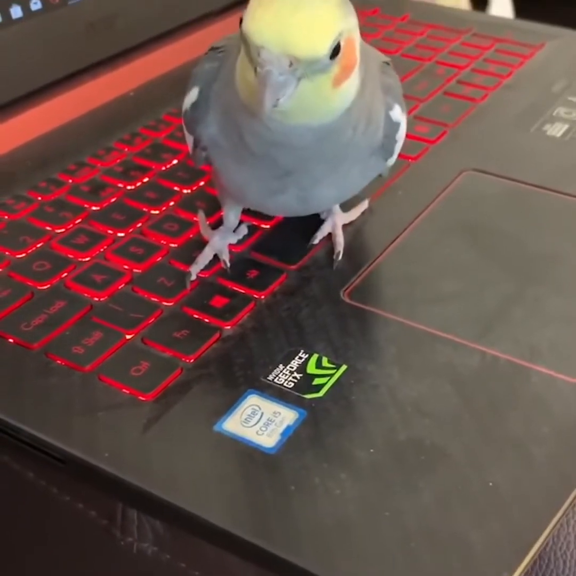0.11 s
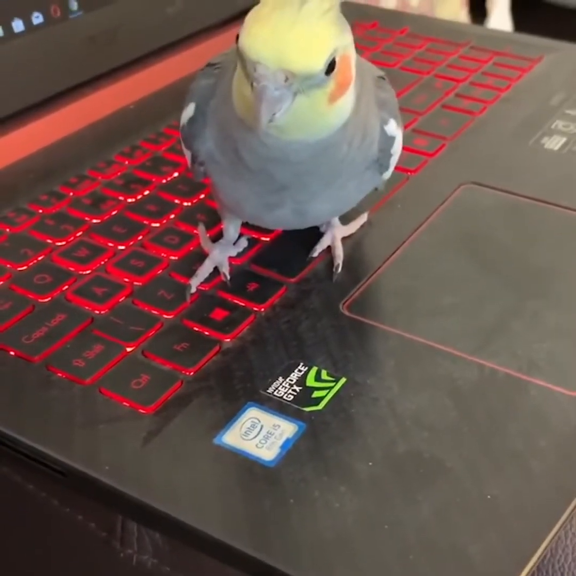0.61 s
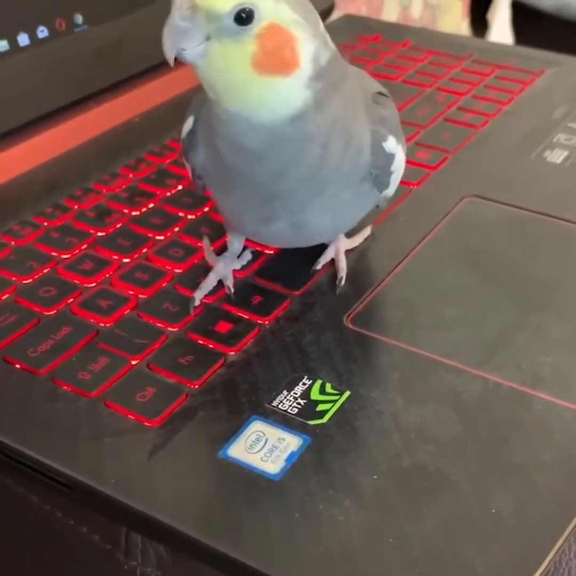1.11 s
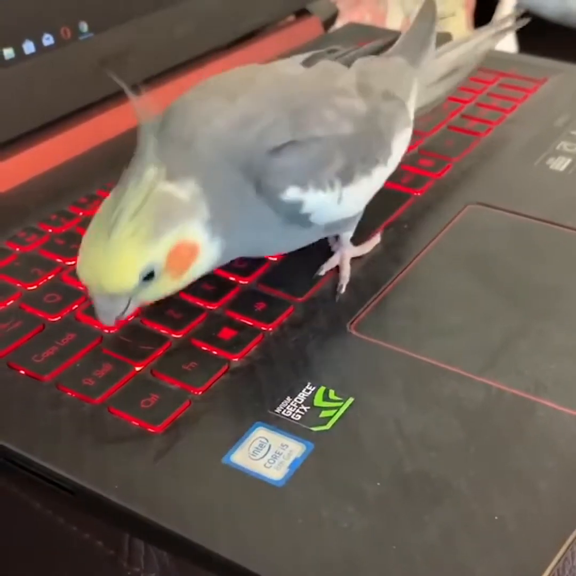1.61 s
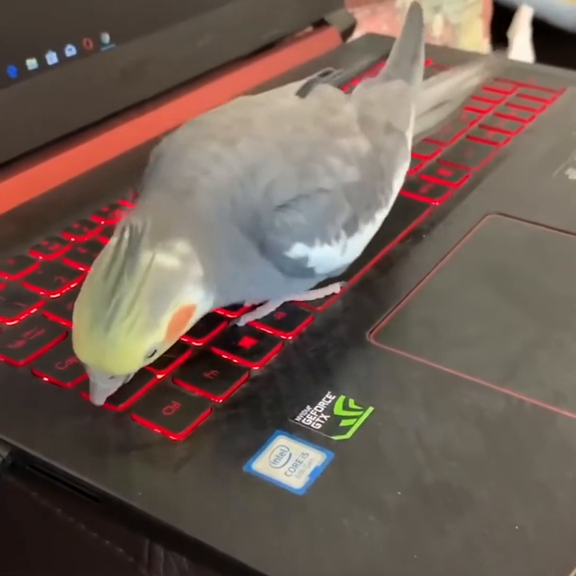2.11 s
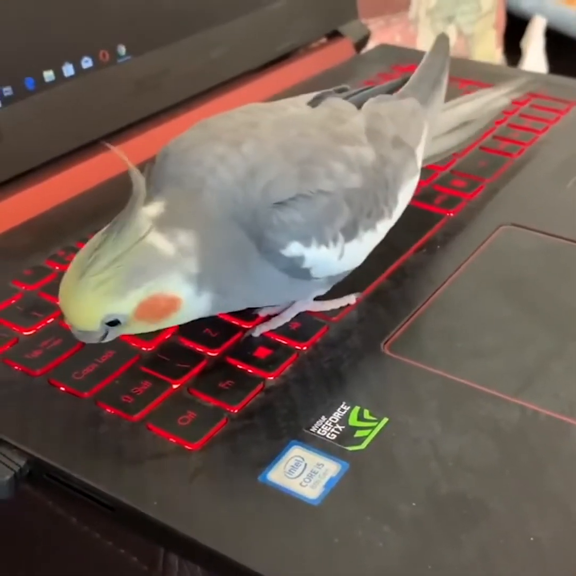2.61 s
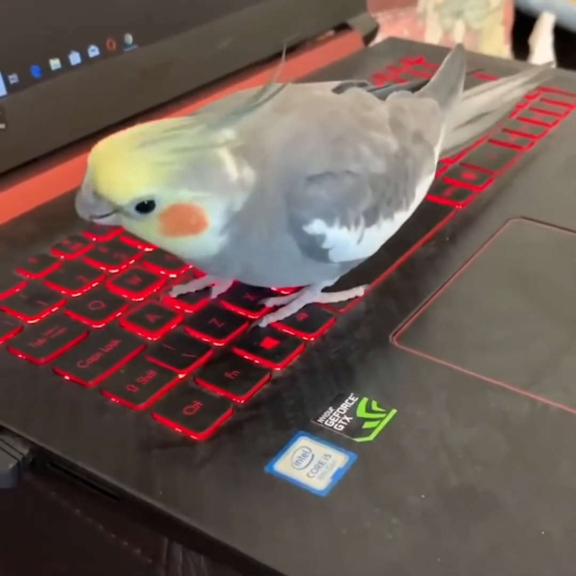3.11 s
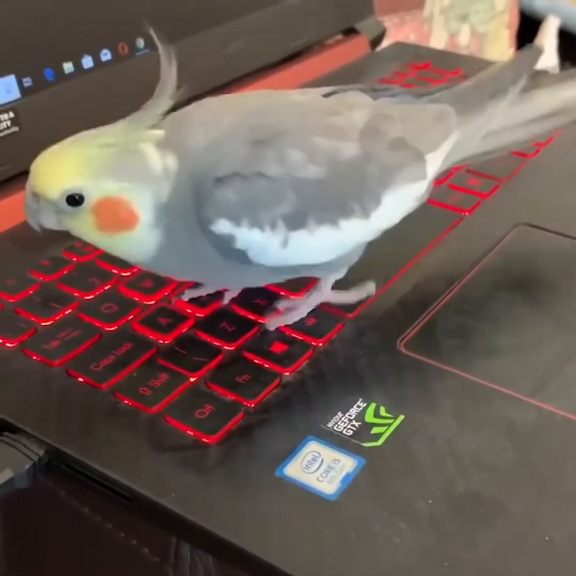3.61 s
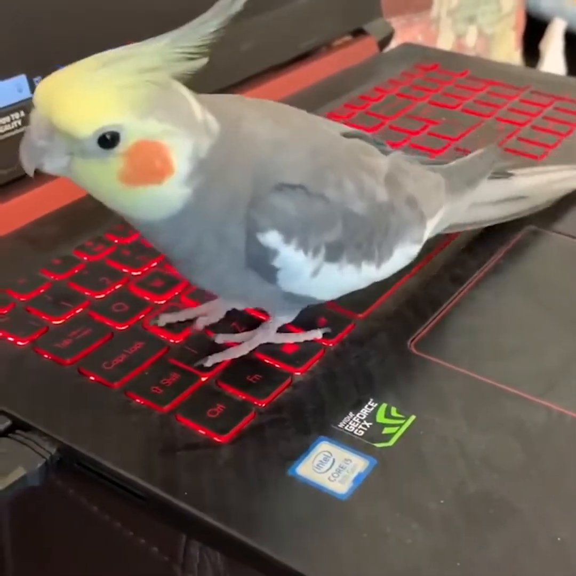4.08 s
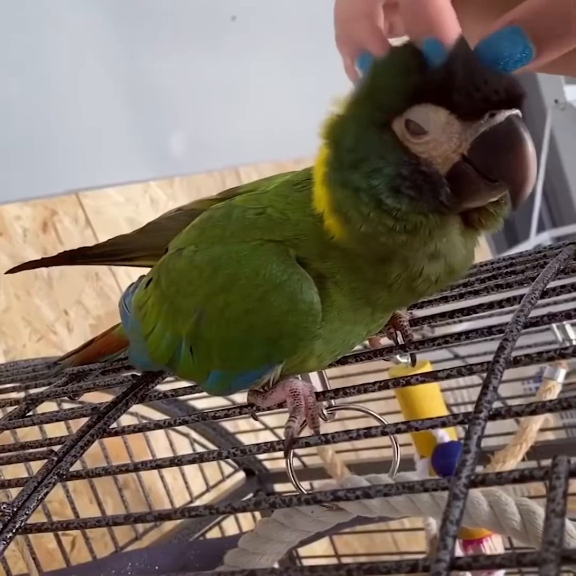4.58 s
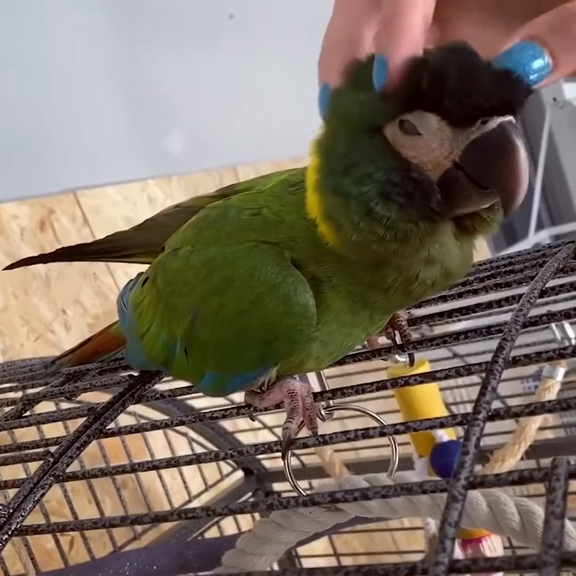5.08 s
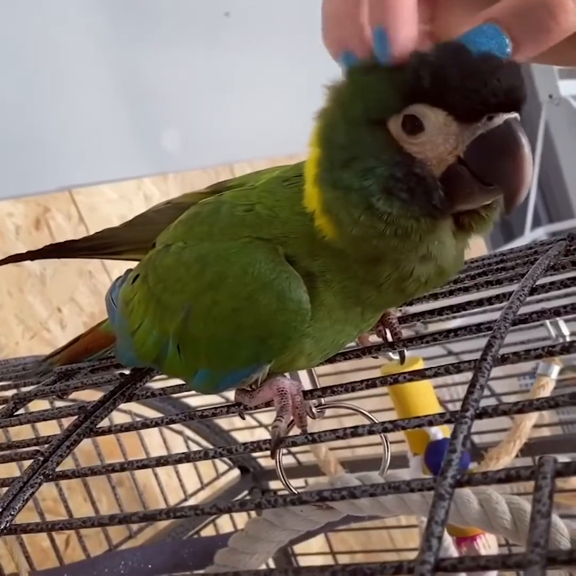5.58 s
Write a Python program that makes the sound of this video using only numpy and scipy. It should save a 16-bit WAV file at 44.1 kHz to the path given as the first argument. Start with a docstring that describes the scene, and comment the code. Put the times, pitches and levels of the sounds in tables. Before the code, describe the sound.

In a very quiet room a small bird steps on laptop keys: soft thuds, then crisp claw ticks and dry scrapes in uneven clusters. After a near-silent gap, four evenly spaced hollow knocks ring a wooden table, beaks tapping close to a phone microphone. An abrupt cut brings a steady low fan hum and blowing air, with a brief soft feather ruffle.

```python
"""Parrot on a laptop, then fan room

In a quiet room claws tick and scrape on keys (noise bursts and slips through resonances), soft steps thud
(sine plus ringing noise) and four like knocks ring a wooden table (decaying modes and a dense noise tail).
Then a cut to a second room: a fan motor hums (wavering tones) and blows (shaped noise) while fingers
ruffle feathers (dense slips). A phone with two microphone ports listens."""
import sys
import numpy as np
from scipy import signal
from scipy.fft import rfft, irfft
from scipy.io import wavfile
from scipy.ndimage import uniform_filter1d

SR = 44100
rng = np.random.default_rng(int(sys.argv[2]) if len(sys.argv) > 2 else 0)


def gain_from_db(level_db):
    """Convert decibel levels to linear amplitude factors (20 dB per decade)."""
    decades = np.asarray(level_db, float) / 20
    return 10 ** decades


def to_wav(s):
    """Save 16-bit WAV."""
    ch = np.atleast_2d(s).T  # columns
    pcm = np.round(np.clip(ch, -1, 1) * 32767)  # PCM
    wavfile.write(sys.argv[1], SR, pcm.astype(np.int16))


N = 251790

# Key cap resonances. Each row: centre in Hz, width in Hz, level in dB.
KEY_CAP = [(3260, 1350, -2.5), (6170, 2140, 9.5), (7900, 2260, 13.5), (8970, 1290, 14.5), (10360, 1800, -1),
           (11550, 960, -3)]
# Resonances of the plate under the keys. Each row: centre in Hz, width in Hz, level in dB.
KEY_PLATE = [(800, 1000, -11.5), (1105, 160, 8), (1586, 1360, -1)]
# Phase between the ports. Each row: frequency in Hz, lead of the left in rad.
PORT_LEAD = [(60, 0), (1500, 0.83), (3300, 1.3), (4400, 3), (5300, 4), (6900, 6), (8600, 9.5), (9400, 10),
             (11000, 11), (13500, 10)]


def evened(x):
    """Scales to rms 1."""
    return x / np.sqrt(np.mean(x ** 2) + 1e-20)


def read(points, hz):
    """Looks up a table on a log-frequency axis."""
    f, value = np.transpose(points)
    return np.interp(np.log(hz + 1), np.log(f + 1), value)


def add(mix, s, sound):
    """Mixes a sound in at s seconds."""
    part = mix[..., round(s * SR):][..., :sound.shape[-1]]
    part += sound[..., :part.shape[-1]]


def ring(x, modes):
    """Sums one-pole complex resonances (Hz, width, dB) driven by x, with alternating signs."""
    out = np.zeros(x.shape)
    for k, (hz, width, db) in enumerate(modes):
        pole = np.exp((2j * hz - width) * np.pi / SR)
        mode = signal.lfilter([1], [1, -pole], x).real
        out += (-1) ** k * gain_from_db(db) * (1 - abs(pole)) * mode
    return out


def noise(colour, same, lead, size, patchy_db):
    """Two-port noise as short-time spectra (channel, Hz, frame) with drifting patches."""
    hz = np.fft.rfftfreq(size, 1 / SR)[:, None]
    a, b, c, d, patches = rng.standard_normal((4 * N // size + 5, len(hz), 5)).T
    patches = uniform_filter1d(patches, size=12, axis=0)
    patches = evened(uniform_filter1d(patches, size=10, axis=1))
    like = np.clip(read(same, hz), -1, 1)
    left = a + 1j * b
    shared = like * left * np.exp(-1j * read(lead, hz))
    right = shared + np.sqrt(1 - like ** 2) * (c + 1j * d)
    return np.array([left, right]) * gain_from_db(read(colour, hz) + patchy_db * patches)


def played(z):
    """Short-time spectra back to sound."""
    size = 2 * z.shape[1] - 2
    return signal.istft(z, nperseg=size, noverlap=3 * size // 4)[1][:, :N]


def rubbing(rubs, bodies, per_s, spread_db):
    """Dense tiny slips of uneven size; each rub swells, fades and mostly rings the body nearest its brightness."""
    rise, edge_db = 0.5, -19  # share of a rub before its peak, level at its ends
    focus_db = -18.5  # loss at a brightness distance of 1
    slips = rng.choice([-1., 1.], (2, N)) * (rng.random((2, N)) < per_s / SR)
    slips *= gain_from_db(spread_db * np.minimum(rng.exponential(1, (2, N)), 2.5))
    out, t = np.zeros((2, N)), np.arange(N) / SR
    for place, modes in bodies:
        power = np.zeros(N)
        for s, length, db, bright in rubs:
            near = slice(max(round((s - 2 * length) * SR), 0), round((s + 2 * length) * SR))
            away = np.maximum((s - t[near]) / rise, (t[near] - s) / (1 - rise)) / length
            power[near] += gain_from_db(db + focus_db * (bright - place) ** 2 + edge_db * away) ** 2
        out += np.sqrt(power) * evened(ring(slips, modes))
    return out


def hum(tones, wander):
    """Tones (Hz, dB rms before wavering) whose strength and phase waver, the phase of higher ones more."""
    t, out = np.arange(N) / SR, np.zeros(N)
    for hz, db in tones:
        slow = uniform_filter1d(rng.standard_normal((2, N)), size=1500)
        swell, drift = uniform_filter1d(slow, size=1500)
        turns = hz * t + rng.random() + wander * np.sqrt(hz) * evened(drift)
        out += gain_from_db(db + 2.2 * evened(swell)) * np.sqrt(2) * np.sin(2 * np.pi * turns)
    return out


def ticks():
    """A claw tip chatters for a moment and rings the key cap and the plate under it."""
    # Each row: time in seconds, cap peak in dB before filtering, plate peak in dB re cap, chatter t60 in seconds.
    tick_rows = [(1.42, -69.5, 11, 0.012), (1.4616, -59, -21, 0.012), (1.501, -55, -25, 0.006),
                 (1.515, -53, -24, 0.008), (1.5245, -28.5, -27.5, 0.0079), (1.529, -50, -13, 0.02),
                 (1.608, -47.5, -5, 0.028), (1.8301, -25.5, -17.5, 0.014), (1.8345, -28, -11, 0.0051),
                 (1.8437, -20, -17.5, 0.0066), (1.846, -39, -6, 0.011), (2.013, -40, -16, 0.014),
                 (2.064, -54, -10, 0.0089), (2.0796, -53, -17, 0.033), (2.1025, -44, -23, 0.013),
                 (2.129, -37, -8, 0.009), (2.1896, -52.5, -1.5, 0.02), (2.26, -63, -3, 0.029),
                 (2.322, -46, -25, 0.011), (2.372, -58, -1, 0.0082), (3.554, -72, 18, 0.012),
                 (3.905, -60, 10, 0.031), (4.054, -63, -7, 0.017), (4.067, -52, -1, 0.0093),
                 (3.7823, -38, -34, 0.013), (3.799, -36.5, -19, 0.029), (4.166, -32, -20, 0.008),
                 (4.175, -45, -9, 0.0059), (4.198, -58, 14, 0.011)]
    out, t = np.zeros(N), np.arange(2000) / SR
    for (s, db, dull_db, t60), jitter in zip(tick_rows, rng.standard_normal((len(tick_rows), 2000))):
        rise = 0.14 * t60  # a longer scratch also starts more gently
        decay_db = -60 * np.maximum(t - 2 * rise, 0) / t60
        onset_db = -30.0 * np.maximum(1 - t / rise / 2, 0)
        chatter = jitter * gain_from_db(decay_db + onset_db)
        chatter[round(2 * rise * SR)] += 2.5  # the tip snaps free
        cap, plate = ring(chatter, KEY_CAP), ring(chatter, KEY_PLATE)
        tick = cap / abs(cap).max() + gain_from_db(dull_db) * plate / abs(plate).max()
        add(out, s - rise, gain_from_db(db) * tick)
    return out


def scrapes():
    """Claws and feathers rub: slips ring the plate, the lower and the upper cap modes."""
    # Each row: peak time in seconds, length in seconds, level in dB,
    # brightness (-1 plate, 0 key caps, 1 finest fizz).
    scrape_rows = [(.2, 0.31, -70.5, 0.33), (.55, .16, -75, 0.045), (1.02, 0.071, -57, -1.4),
                   (1.11, 0.077, -60.5, -1.3), (1.465, .09, -71, 0.77), (1.535, 0.13, -61.5, 0.42),
                   (1.62, 0.059, -59.5, 0.46), (1.86, 0.1, -62.5, 0.13), (1.88, 0.13, -60, 0.24),
                   (1.91, 0.092, -65, -0.81), (1.93, 0.12, -55, 1.15), (1.97, 0.24, -69, 0.36),
                   (2.01, 0.058, -63, 0.018), (2.08, 0.07, -52.5, 0.47), (2.13, 0.074, -60, -0.094),
                   (2.11, 0.13, -62.5, 1), (2.24, 0.3, -68.5, -1.08), (2.265, 0.11, -65.5, 0.97),
                   (2.33, 0.11, -65, 0.085), (2.375, 0.043, -72, 0.58), (2.965, 0.095, -68, 0.31),
                   (3.76, 0.052, -62, -0.41), (3.805, 0.044, -45, 0.59), (4.075, 0.044, -63, -0.6),
                   (4.16, 0.11, -73, 0.82)]
    bodies = [(-0.52, KEY_PLATE + KEY_CAP[:1]), (-0.2, KEY_CAP[1:3]), (0.91, KEY_CAP[3:])]
    return rubbing(scrape_rows, bodies, per_s=15000, spread_db=5.5)


def claw_contacts():
    """Ticks plus one scrape stream, and a second stream; claws move little air in the bass and fade at the top."""
    scrape, scatter = scrapes()
    low_cut = signal.butter(2, 450, "highpass", fs=SR, output="sos")
    top_cut = signal.butter(8, 12800, fs=SR, output="sos")
    return signal.sosfilt(np.vstack([low_cut, top_cut]), [ticks() + scrape, scatter])


def steps():
    """Body weight lands softly: a short shove of noise into a broad, low ring of the case, plus a sine."""
    # Each row: start in seconds, nominal peak in dB, pitch in Hz, t60 in seconds.
    step_rows = [(1.013, -55.5, 774, 0.06), (1.014, -58, 455, 0.14), (1.093, -51, 478, 0.11),
                 (1.099, -40.5, 178, 0.039), (1.121, -52, 313, 0.1), (1.524, -51.5, 800, 0.036),
                 (1.534, -40.5, 276, 0.024), (1.612, -51.5, 533, 0.041), (1.626, -36.5, 101, 0.05),
                 (1.837, -50, 687, 0.063), (1.853, -39, 111, 0.038), (1.879, -42.5, 95.4, 0.24),
                 (2.018, -52.5, 353, 0.07), (2.193, -55, 500, 0.063), (2.205, -52, 290, 0.08)]
    out, t = np.zeros(N), np.arange(6000) / SR
    for (s, db, hz, t60), jitter in zip(step_rows, rng.standard_normal((len(step_rows), 6000))):
        fade = gain_from_db(-60 * t / t60) * np.minimum(t / 0.0017, 1)
        broad = [(hz, .5 * hz, 0)]
        loose = ring(ring(jitter, broad), broad)
        add(out, s, gain_from_db(db) * fade * (0.67 * np.sin(2 * np.pi * hz * t) + .5 * evened(loose)))
    return out


def rebound(t):
    """After each knock a wobble returns, speeding up as it settles."""
    delay_ms, length_ms, level_db = 25, 44.2, -3.5
    from_hz, to_hz, bend = 117, 364, 1.71
    u = np.clip((1000 * t - delay_ms) / length_ms, 0, 1)
    rising_hz = from_hz + (to_hz - from_hz) * u ** bend
    envelope = gain_from_db(level_db - 5.2 * u) * np.sqrt(np.sin(np.pi * u) + 1e-9)
    return envelope * np.sin(2 * np.pi * np.cumsum(rising_hz * (u > 0)) / SR)


def table_modes(t, bright_db):
    """Decaying table modes, slightly unlike per knock; bending waves bring the high modes first."""
    # Each row: frequency in Hz, level in dB, t60 in seconds, arrival in ms.
    # Level and pitch are the values before the knock-to-knock spread.
    mode_rows = [(86, -6, 0.19, 8.1), (99, -8, 0.27, 7.3), (132, 2.5, 0.081, 9.1), (133, -15.5, 0.5, 8.8),
                 (149, -17, 0.54, 6), (227.6, -14.5, 0.52, 5.6), (159, 5.5, 0.032, 10.24),
                 (217, 1, 0.11, 4.68), (276.5, -15, 0.47, 6.16), (268.7, 6, 0.073, 6.85),
                 (352.4, -23, 0.43, 4.6), (479.4, -0.5, 0.069, 1.9), (494, -14, 0.3, 1.61),
                 (837, -18.5, 0.072, 0.75), (999, -25.5, 0.07, 0.068), (1390, -42, 0.16, 0.71),
                 (1718, -27, 0.15, 0.39), (2290, -35.5, 0.071, 0.21), (3400, -44, 0.11, 0.69)]
    unlike_db, unlike_pitch = 0.5, 0.0095  # spread at 200 Hz, in dB and as a share of pitch
    out = np.zeros(len(t))
    for (hz, db, t60, arrival_ms), (louder, higher) in zip(mode_rows, rng.standard_normal((len(mode_rows), 2))):
        since = np.maximum(t - arrival_ms / 1000, 0)
        swell = 1 - np.exp(-since * hz / 0.67)  # builds over about one cycle
        spread = np.sqrt(hz / 200)
        level_db = db + unlike_db * spread * louder + bright_db * (hz > 700) - 60 * since / t60
        mode_hz = hz * (1 + unlike_pitch * spread * higher)
        out += gain_from_db(level_db) * swell * np.sin(2 * np.pi * mode_hz * since)
    return out


def knocks():
    """Knocks strike nearly one spot: modes, rising rebound, a soft second landing and a dense banded tail."""
    # Each row: time in seconds, level in dB, brightness in dB (modes above 700 Hz and the tail).
    knock_rows = [(3.566, -22, 1), (3.7501, -23.5, 4), (3.917, -23.5, -0.5), (4.081, -23.5, 2)]
    # Dense tail colour. Each row: frequency in Hz, relative level in dB.
    splash_colour = [(150, -17.5), (350, -1), (520, -12), (680, -12.5), (1000, -19.5), (1400, -17),
                     (1800, -19.5), (2600, -31.5), (3500, -25), (4900, -33.5), (7000, -38), (11000, -53.5)]
    # Tail decay before the band spread. Each row: frequency in Hz, t60 in seconds.
    splash_t60 = [(300, 0.38), (1500, 0.28), (5000, 0.25), (12000, 0.16)]
    # Tail likeness of the ports. Each row: frequency in Hz, likeness.
    splash_same = [(300, 1), (1000, 0.067), (2500, 0.048), (4700, 0.87), (12000, 0.76)]
    fade_in_s, rise_db_per_s = .012, 4489  # short fade-in of the tail before the knock's full level
    bounce_s, bounce_db = 0.082, -17
    t = np.arange(SR // 2) / SR
    wobble = rebound(t - fade_in_s)
    z = noise(splash_colour, splash_same, PORT_LEAD, size=256, patchy_db=2.5)
    frame_s, hz = np.arange(400) * 64 / SR, np.fft.rfftfreq(256, 1 / SR)[:, None]
    fade_in = gain_from_db(-rise_db_per_s * np.maximum(fade_in_s - t, 0)) * np.minimum(t / fade_in_s * 2, 1)
    rattle = evened(uniform_filter1d(rng.standard_normal(z.shape[2]), size=4))
    z *= gain_from_db(1.2 * rattle * (hz > 700))  # loose keys rattle along
    bands = evened(uniform_filter1d(rng.standard_normal((len(knock_rows), len(hz))), size=2))
    bands = bands[:, :, None] * (hz > 600)
    out = np.zeros((2, N))
    for k, (s, db, bright_db) in enumerate(knock_rows):
        sound = wobble + table_modes(t - fade_in_s, bright_db)
        # the case rocks back and lands once more, softly
        add(sound, bounce_s, gain_from_db(bounce_db) * uniform_filter1d(sound, size=90))
        band = bands[k]  # random level and decay differences between bands, drawn anew for each knock
        tail_db = 2.5 * band - 60 * frame_s / (read(splash_t60, hz) * np.exp(0.077 * band))
        splash = played(z[:, :, 400 * k:400 * k + 400] * gain_from_db(tail_db))[:, :len(t)]
        add(out, s - fade_in_s, gain_from_db(db) * (sound + gain_from_db(bright_db - 25.0) * evened(splash) * fade_in))
    return out


def ruffles():
    """Fingers in feathers: dense slips through two broad resonances."""
    # Each row: peak time in seconds, length in seconds, level in dB, brightness.
    ruffle_rows = [(4.7, 0.26, -65, 0), (4.856, 0.024, -78, 0), (5.1, 0.37, -79, 0)]
    feathers = [(0, [(4700, 2950, 9.1), (6700, 2700, 8.7)])]  # place, (Hz, width Hz, dB)
    return rubbing(ruffle_rows, feathers, per_s=7200, spread_db=-0.5)


def fan():
    """Air blows as shaped two-port noise; the motor adds wavering tones."""
    # Air noise colour. Each row: frequency in Hz, relative level in dB per Hz.
    air_colour = [(25, -15), (60, -9.5), (100, -16.5), (150, -19), (210, -8), (450, -15.5), (1000, -14.5),
                  (1250, -23.5), (1750, -24), (2500, -33), (4000, -38), (6500, -52.5), (10200, -55.5),
                  (13700, -62)]
    # Port likeness. Each row: frequency in Hz, likeness.
    air_same = [(60, 1), (130, 0.9), (280, 0.91), (600, 0.55), (1500, 0.4), (2800, 0.044), (8500, 0.6),
                (13000, 0.11)]
    # Port phase. Each row: frequency in Hz, lead of the left in rad.
    air_lead = [(60, 1), (300, -1.04), (700, -1.64), (1800, -0.8), (5000, -2.5)]
    # Balance. Each row: frequency in Hz, dB the left is louder.
    air_side = [(100, 0.5), (300, 4.5), (700, 4.5), (2000, -1), (5500, 0.5)]
    # Motor tones at mains multiples and housing. Each row: frequency in Hz, level in dB rms before wavering.
    motor_tones = [(100.3, -49), (200, -57), (301, -58.5), (378, -62), (603, -63.5), (802, -62.5),
                   (1008, -64.5)]
    air = noise(air_colour, air_same, air_lead, size=2048, patchy_db=1.44)
    air[0] *= gain_from_db(read(air_side, np.fft.rfftfreq(2048, 1 / SR)))[:, None]
    return gain_from_db(-46) * evened(played(air)) + hum(motor_tones, wander=0.0058)


def quiet_room():
    """First room's background: shaped two-port noise and faint laptop and mains tones."""
    # Noise colour. Each row: frequency in Hz, relative level in dB per Hz.
    room_colour = [(12, -54.5), (20, -23), (33, 0.5), (53, -2), (81, -14.5), (299, -22), (696, -31),
                   (756, -27.5), (866, -32.5), (2320, -36), (5250, -41), (6530, -40.5), (13700, -50.5)]
    # Port likeness. Each row: frequency in Hz, likeness.
    room_same = [(60, 1.0), (130, 1), (280, 0.36), (600, 0.027), (2500, 0.044), (4700, 0.92), (7000, 1),
                 (9000, 0.64), (10500, 0.067), (12500, 0.8)]
    # Tones. Each row: frequency in Hz, level in dB rms before wavering.
    room_tones = [(49, -64.5), (297, -82.5)]
    z = noise(room_colour, room_same, PORT_LEAD, size=2048, patchy_db=3.0)
    return gain_from_db(-62) * evened(played(z)) + hum(room_tones, wander=0.01)


def small_room(x, t60, wet_db):
    """Short diffuse tail, different at each port."""
    t = np.arange(SR // 4) / SR
    tail = rng.standard_normal((2, len(t))) * gain_from_db(-60 * t / t60) * (t > .002)
    return gain_from_db(wet_db) * signal.fftconvolve(x[None], tail / np.linalg.norm(tail[0]), axes=1)[:, :N]


def ports(x):
    """A near sound reaches the left port ahead of the right by a phase that varies with pitch."""
    turn = np.exp(-1j * read(PORT_LEAD, np.fft.rfftfreq(N, 1 / SR)))
    return np.array([x, irfft(rfft(x) * turn, N)])


def scene():
    """The keyboard room, then a quick cross-fade to the fan room."""
    cut_s, cross_fade_s = 4.198, 0.0019
    claws, scatter = claw_contacts()
    first = ports(steps() + claws) + small_room(claws, t60=0.025, wet_db=-17.0)
    first += 0.59 * scatter  # slips straight ahead reach both ports together
    first += knocks() + quiet_room()
    second = ruffles() + fan()
    later = np.clip((np.arange(N) / SR - cut_s) / cross_fade_s, 0, 1)
    return first * (1 - later) + second * later


def low_pass(x):
    """Removes everything above the highest recorded frequency."""
    return signal.sosfilt(signal.butter(12, 14600, fs=SR, output="sos"), x)


def record(dry):
    """The microphone rolls off the deep bass and the top; a quick fade ends the sound."""
    low_cut = signal.butter(3, 36, "highpass", fs=SR, output="sos")
    top_cut = signal.butter(8, 13300, fs=SR, output="sos")
    fade = np.minimum(np.arange(N)[::-1] / SR / .004, 1)
    mix = fade * signal.sosfilt(np.vstack([low_cut, top_cut]), dry)
    return low_pass(mix)


dry = scene()
out = record(dry)
to_wav(out)
```